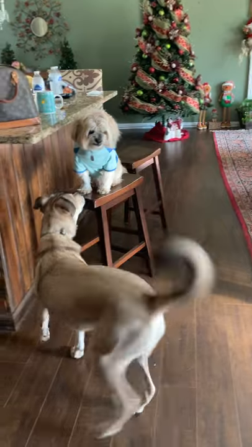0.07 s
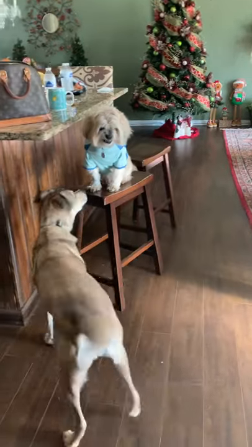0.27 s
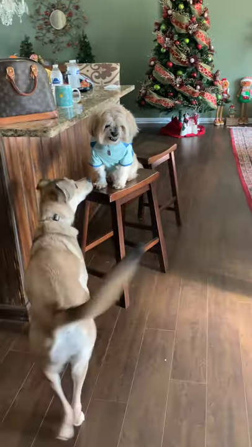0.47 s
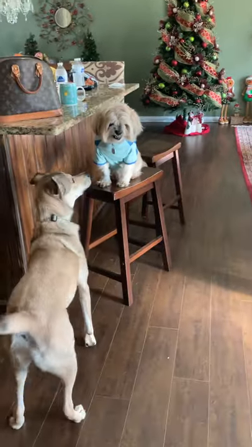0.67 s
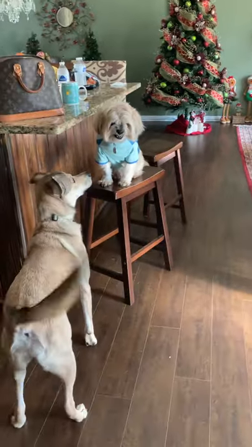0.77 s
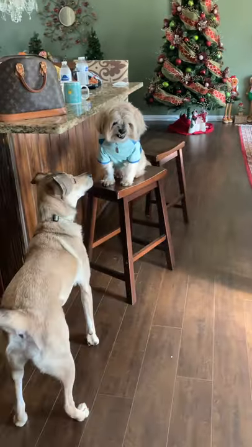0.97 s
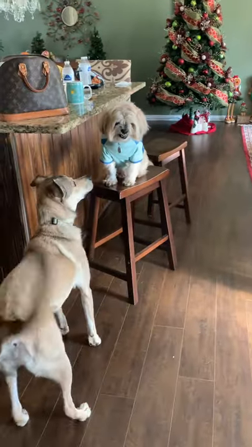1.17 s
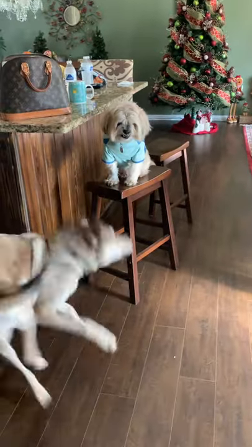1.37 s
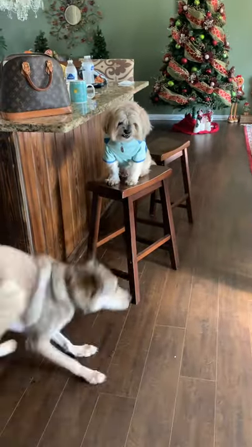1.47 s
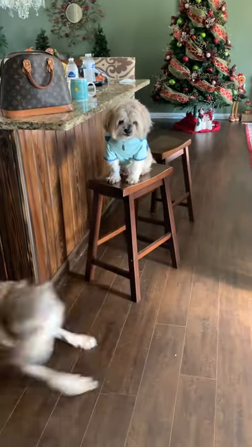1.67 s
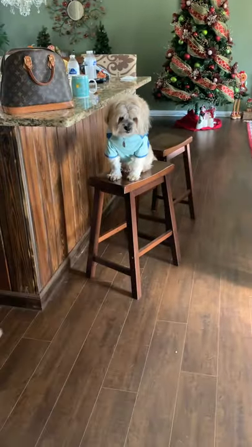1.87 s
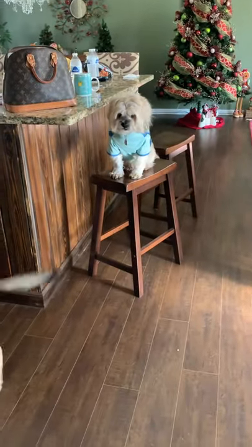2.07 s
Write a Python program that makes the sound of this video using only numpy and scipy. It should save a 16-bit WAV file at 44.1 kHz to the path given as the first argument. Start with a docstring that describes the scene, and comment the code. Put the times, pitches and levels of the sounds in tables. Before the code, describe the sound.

A large dog's paws shuffle on a hardwood floor, with a few soft lip smacks. After a lull it springs away, claws clicking and skidding, its weight thumping the boards in an echoing room with a faint hum.

```python
"""A large dog shuffles on a hardwood floor in a live room, over a low mains hum.
From 0.3 to 0.6 s it smacks its lips four times: wet ticks and popping mouth resonances.
After a lull it springs away at 1.1 s: claws tick and skid on the finish, pads knock the boards.
From 1.4 s on, its weight lands hard and makes the floor boom."""
import sys
import numpy as np
from scipy import signal
from scipy.fft import rfft, irfft
from scipy.io import wavfile
from scipy.ndimage import uniform_filter1d

SR = 44100
rng = np.random.default_rng(int(sys.argv[2]) if len(sys.argv) > 2 else 0)


def dump(signal):
    """Clip the signal to [-1, 1] and save it as 16-bit WAV at the path in sys.argv[1]."""
    limited = np.clip(np.atleast_2d(signal).T, -1, 1)
    pcm = np.round(limited * 32767).astype(np.int16)
    wavfile.write(sys.argv[1], SR, pcm)


N = 93977

# room air spectrum: freq_hz, gain_db
AIR_SPECTRUM = [(20, -14), (60, 2), (120, -2), (250, -2), (450, -17), (800, -15), (1300, -27), (3000, -44),
                (8000, -35), (16000, -35)]
# reverb decay: freq_hz, t60_s
REVERB_T60 = [(60, 0.04), (250, 0.78), (800, 0.84), (2500, 0.7045), (4500, 0.56), (8000, 0.44), (16000, 1)]
# reverb spectrum: freq_hz, gain_db
REVERB_SPECTRUM = [(60, -4.5), (150, 4), (400, 4.5), (1000, 1.5), (3500, 1), (8000, -0.5), (13800, -8),
                   (15700, -3), (16300, -32)]
# left-right likeness: freq_hz, coherence
STEREO_COHERENCE = [(50, 1), (200, 0.91), (500, 0.2), (1500, 0.12), (4100, 0.1), (5000, .95), (6200, 0.45),
                    (7200, 1), (8300, 0.55), (9500, 1), (10200, 1), (11100, .6), (11900, 1), (13000, 1),
                    (13600, .6), (14400, 1)]
# phase of left ahead of right: freq_hz, lead_rad
STEREO_LEAD = [(0, 0), (300, -.1), (1200, -.8), (1800, .2), (2600, 2.4), (3700, 4.3), (4500, 3.2),
               (5500, 3.3), (6700, 6.1), (7600, 6.4), (8500, 7.8), (9200, 9.4), (10200, 9.4), (11800, 12.5),
               (13200, 12.6), (14400, 15.7)]

# lip smacks: start_s, level_db, pitch_hz, tick_db, low_mode_weight_db
LIP_SMACKS = [(0.311, -29.5, 2097, -43, -1), (0.3572, -31.5, 2065, -35.5, -1),
              (0.4165, -32.5, 1980, -35, -5), (0.5707, -35.5, 2204, -28.5, -11)]
# mouth resonances: pitch_ratio, level_db, delay_s, decay_s
MOUTH_MODES = [(0.83, 3, 0, 0.0037), (.66, -5.5, .005, 0.013), (.3, -3, .005, 0.011)]
# smack noise spectrum: freq_hz, gain_db
SMACK_SPECTRUM = [(100, -10.5), (400, -9.5), (700, -3.5), (1400, -5), (2100, -12.5), (3000, -7.5),
                  (4200, -10), (6000, -18), (16000, -53)]
# wet tick spectrum: freq_hz, gain_db
WET_TICK_SPECTRUM = [(100, -7), (900, -15.5), (2000, -0.5), (2700, -4.5), (3600, 0.5), (4400, -0.5),
                     (5500, -15.5), (9000, -19), (13500, -24.5), (15700, -18), (16300, -43)]

# claws skidding on the finish: start_s, rise_s, decay_s, level_db, tilt_db_per_octave
CLAW_SKIDS = [(.04, 0.061, 0.021, -47.5, -0.5), (0.39, 0.033, 0.074, -52.5, -2.5),
              (0.491, 0.06, 0.038, -48.5, -1.5), (1.12, 0.034, 0.01, -47, -1),
              (1.146, 0.025, 0.027, -26.5, -1), (1.2, 0.027, 0.025, -26.5, -1),
              (1.47, 0.038, 0.054, -30.5, -1), (1.579, 0.029, 0.074, -34.5, 0),
              (1.68, 0.013, 0.012, -36.5, 0.5), (1.741, 0.011, .012, -39, -2),
              (1.834, 0.014, 0.023, -42.5, -2), (1.92, 0.098, 0.076, -41, -2)]
# skid spectrum: freq_hz, gain_db
SKID_SPECTRUM = [(100, -17.5), (600, -7), (1500, -5.5), (2400, -2), (3700, -1.5), (4700, -0.5), (6000, -3),
                 (7800, -3.5), (10000, 2.5), (13600, -8.5), (15700, -9), (16200, -61)]
# single claws dragging: start_s, length_s, level_db, from_hz, to_hz
CLAW_RASPS = [(1.172, 0.072, -33.5, 3512, 3600), (1.221, 0.025, -33, 7300, 7930),
              (1.528, .07, -39.5, 4316, 3427), (1.615, 0.042, -40, 8000, 7290)]
# claw strikes: start_s, level_db, decay_s, tilt_db_per_octave
CLAW_STRIKES = [(0.036, -53.5, 0.0099, 2), (0.055, -40.5, 0.0089, -8.5), (.104, -44, 0.0068, -8.5),
                (0.203, -54, 0.0091, 6.5), (1.005, -63, 0.0033, 0), (1.171, -8, 0.00051, 1),
                (1.1916, -15, 0.0011, -3.5), (1.205, -26, 0.00077, -15), (1.3683, -17, 0.0011, 9),
                (1.5117, -17, 0.0017, 8.5), (1.5156, -12, 0.0015, 7.5), (1.694, -34, 0.0097, 6.5)]
# claw strike spectrum: freq_hz, gain_db
CLAW_SPECTRUM = [(100, -14.5), (600, -18), (1500, -19), (2500, 1.5), (3800, 11), (5500, 4.5), (7500, 3.5),
                 (11000, -4.5), (13500, -0.5), (14600, -8), (16500, -54)]
# claw resonances: freq_hz, level_db, t60_s
CLAW_MODES = [(3470, -19.5, 0.0065), (6730, -6, 0.0054), (8100, -10.5, 0.01), (7860, -19, 0.0067)]

# hollow knocks of single boards: start_s, level_db, pitch_hz, decay_s
BOARD_KNOCKS = [(0.0355, -42.5, 1548, 0.0072), (0.0566, -32, 443, 0.0047), (0.0567, -34.5, 603, 0.0055),
                (0.171, -35.5, 214, 0.011), (0.229, -49, 208, 0.016), (.293, -48, 737, 0.013),
                (0.415, -31.5, 157, 0.0049), (0.732, -49.5, 762, 0.017), (1.069, -43, 756, 0.0096),
                (1.0685, -50, 363, 0.0062), (1.0674, -60, 1276, 0.0066), (1.1445, -37.5, 803, 0.0052),
                (1.3671, -20, 1265, 0.0026), (1.368, -24.5, 550, 0.0033), (1.476, -30.5, 815, 0.0089),
                (1.5148, -15.5, 1565, 0.0026), (1.514, -19.5, 792, 0.0073), (1.514, -22.5, 967, 0.0074),
                (1.514, -20, 359.7, 0.0094), (1.593, -29, 393, 0.0056), (1.594, -31, 821, 0.012),
                (1.655, -40, 768, 0.011), (1.708, -35, 738, 0.0061), (1.753, -34.5, 762, 0.0085),
                (1.756, -37, 417.7, 0.0096), (1.796, -35, 415, 0.011), (1.8, -46, 717, 0.0064),
                (1.85, -27.5, 348, 0.0088), (1.8495, -31, 718, 0.003)]
# pads slapping the boards: start_s, level_db, decay_s, tilt_db_per_octave
PAD_SLAPS = [(.058, -36.5, 0.0052, 1.5), (0.111, -40, 0.027, -2.5), (0.534, -43.5, 0.016, -3.5),
             (1.172, -39.5, 0.075, 4.5), (1.367, -24, 0.0075, 2), (1.388, -31.5, 0.045, -3.5),
             (1.44, -28, 0.0061, 1), (1.514, -17.5, 0.0052, 4.5), (1.545, -28, 0.027, -1.5),
             (1.717, -35, 0.0065, -4), (1.851, -29.5, 0.0093, -3.5), (1.894, -45, 0.045, 3),
             (2.02, -39.5, 0.053, 2)]
# pad slap spectrum: freq_hz, gain_db
PAD_SPECTRUM = [(30, -23.5), (90, 7.5), (170, 10), (400, 2), (600, -9.5), (850, -3), (1200, -16),
                (1700, -9.5), (2600, -21.5), (5000, -22.5), (16000, -39)]
# board resonances: freq_hz, level_db, t60_s
BOARD_MODES = [(344, -26, 0.22), (431, -15.5, 0.18), (706, -8, 0.087), (773, -52, 0.14), (1020, -13, 0.046)]
# weight landing on the floor: deepest_flex_s, level_db, pitch_hz, half_width_s
LANDINGS = [(0.08, -32.5, 92.8, 0.018), (0.141, -37, 91, 0.026), (0.186, -36, 108, 0.008),
            (.425, -58, 157, 0.0028), (0.57, -44, 107, 0.013), (1.216, -41, 89.5, 0.013),
            (1.248, -48, 81, 0.0077), (1.293, -42, 104, 0.0092), (1.3934, -14.5, 105.8, 0.0071),
            (1.425, -27.5, 70, 0.012), (1.5386, -9, 79.8, 0.0098), (1.601, -31, 62.5, 0.022),
            (1.727, -32.5, 85, 0.015), (1.876, -14.5, 71, 0.015), (2.058, -24, 72, 0.0091)]
# floor resonances: freq_hz, level_db, t60_s
FLOOR_MODES = [(66, -9.5, 0.25), (105.4, -15, 0.42), (167.5, -26, 0.46), (239.7, -26, 0.57),
               (363.4, -43.5, 1)]

EVENT_TIME_S = np.arange(SR // 2) / SR


def amp(db):
    """Decibels to gain."""
    return 10 ** (np.asarray(db) / 20)


def unit_rms(x):
    """Scale to rms 1."""
    return x / np.sqrt(np.mean(x ** 2) + 1e-20)


def lookup(points, hz):
    """Interpolate a table over log frequency."""
    table_hz, value = np.transpose(points)
    return np.interp(np.log(hz + 1), np.log(table_hz + 1), value)


def add(mix, start_s, sound):
    """Mix a sound in at start_s."""
    part = mix[max(round(start_s * SR), 0):][:len(sound)]
    part += sound[:len(part)]


def butter(order, cutoff_hz, kind="low"):
    """Butterworth filter sections."""
    return signal.butter(order, cutoff_hz, kind, fs=SR, output="sos")


def colour(x, spectrum, tilt_db_per_octave=0, size=2048):
    """Minimum-phase filter of unit energy."""
    hz = abs(np.fft.fftfreq(size, 1 / SR))
    gain_db = lookup(spectrum, hz) + tilt_db_per_octave * np.log2(np.maximum(hz, 100))
    log_response = np.conj(signal.hilbert(np.log(amp(gain_db))))
    taps = np.fft.ifft(np.exp(log_response)).real
    return signal.fftconvolve(x, taps / np.linalg.norm(taps))[:len(x)]


def wobble(rate_hz):
    """Random wavering up to rate_hz, rms 1."""
    return unit_rms(signal.sosfilt(butter(2, rate_hz), rng.standard_normal(len(EVENT_TIME_S))))


def burst(decay_s):
    """Decaying contact noise, whitened; energy set by decay_s."""
    fade = np.exp(-EVENT_TIME_S / decay_s)
    noise = rng.standard_normal(len(fade))
    for _ in range(3):
        spectrum = rfft(noise * fade)
        white = irfft(spectrum / (abs(spectrum) + 1e-12), len(fade))
        noise = white / np.sqrt(fade ** 2 + 0.01)
    return unit_rms(noise * fade) * np.sqrt(np.mean(fade ** 2))


def ring(modes, detune):
    """Decaying modes, tuned slightly differently at each spot struck."""
    out, t = 0, EVENT_TIME_S
    for hz, level_db, t60_s in modes:
        spot_hz = hz * (1 + detune * rng.standard_normal())
        out += amp(level_db - 60 * t / t60_s) * np.sin(2 * np.pi * spot_hz * t)
    return out


def stereo_pair(left, other):
    """Partly coherent left and right from two independent noises."""
    hz = np.fft.rfftfreq(len(left), 1 / SR)
    coherence = np.clip(lookup(STEREO_COHERENCE, hz), 0, 1)
    right = irfft(coherence * rfft(left) + np.sqrt(1 - coherence ** 2) * rfft(other), len(left))
    return np.array([left, right])


def phase_spread(x):
    """Phase difference between left and right."""
    size = 2 * N
    lead_rad = np.interp(np.fft.rfftfreq(size, 1 / SR), *np.transpose(STEREO_LEAD))
    rotation = np.exp(0.5j * np.array([lead_rad, -lead_rad]))
    return irfft(rfft(x, size) * rotation, size)[:, :N]


def air_and_hum(air_db=-61.5, hum_hz=60.1, hum_db=-50.5):
    """Still room air and an appliance's mains hum."""
    air = stereo_pair(*[colour(noise, AIR_SPECTRUM) for noise in rng.standard_normal((2, N))])
    hum = unit_rms(np.sin(2 * np.pi * hum_hz * np.arange(N) / SR))
    return amp(air_db) * air + amp(hum_db) * hum


def reverb(x, early_db=7.5, early_s=0.0076, rise_s=0.006):
    """Dense room reflections, strongest early, each band decaying at its own rate."""
    hz, t, bands = signal.stft(stereo_pair(*rng.standard_normal((2, SR))), SR, nperseg=256)
    t60_s = lookup(REVERB_T60, hz)[:, None]
    fade = amp(-60 * t / t60_s + early_db * np.exp(-t / early_s))
    fade /= np.sqrt(SR * np.mean(fade ** 2, axis=1, keepdims=True))
    gain = amp(lookup(REVERB_SPECTRUM, hz))[:, None]
    tail = signal.istft(bands * fade * gain, SR, nperseg=256)[1]
    tail *= np.minimum(np.arange(tail.shape[1]) / SR / rise_s, 1)
    return signal.fftconvolve(x[None], tail, axes=1)[:, :N]


def furniture_echoes(x, per_side=6, max_db=-15, min_delay_s=0.0015, span_s=0.0083):
    """Single reflections off the nearby cabinet and stools."""
    out = np.zeros((2, N))
    x = signal.sosfilt(butter(2, 473, "high"), x)
    x = signal.sosfilt(butter(10, 13500), x)
    for side in out:
        for distance, strength in rng.random((per_side, 2)):
            add(side, min_delay_s + span_s * distance, amp(max_db) * (2 * strength - 1) * x)
    return out


def lip_smacks(sag=0.23, glide_s=0.0043, rough_rad=0.96, rise_s=0.00055, noise_gain=0.61):
    """A wet tick and a noise burst; mouth resonances pop, sagging in pitch as the lips part."""
    out, t = np.zeros(N), EVENT_TIME_S
    for start_s, level_db, pitch_hz, tick_db, low_weight_db in LIP_SMACKS:
        for ratio, mode_db, delay_s, decay_s in MOUTH_MODES:
            hz = pitch_hz * ratio * (1 + sag * np.exp(-t / glide_s))
            pop = np.sin(2 * np.pi * np.cumsum(hz) / SR + rough_rad * wobble(pitch_hz * ratio / 5))
            envelope = np.exp(-t / decay_s) * (1 - np.exp(-t / rise_s))
            gain = amp(level_db + mode_db + low_weight_db * (2 - ratio))
            add(out, start_s + delay_s, gain * pop * envelope)
        add(out, start_s, amp(level_db) * noise_gain * colour(burst(decay_s=0.014), SMACK_SPECTRUM))
        add(out, start_s, amp(tick_db) * colour(burst(decay_s=0.0025), WET_TICK_SPECTRUM))
    return out


def claw_skids(grain_db=3, chatter_db=3.5):
    """Dense tiny slips that swell and fade with paw pressure."""
    out, t = np.zeros(N), EVENT_TIME_S
    for start_s, rise_s, decay_s, level_db, tilt in CLAW_SKIDS:
        grain = unit_rms(uniform_filter1d(rng.standard_normal(len(t)), size=90))
        grainy_noise = rng.standard_normal(len(t)) * amp(grain_db * grain)
        bands = signal.stft(grainy_noise, nperseg=512)[2]
        # random level patches over frequency and time
        chatter = uniform_filter1d(rng.standard_normal(bands.shape), size=4, axis=0)
        chatter = unit_rms(uniform_filter1d(chatter, size=3, axis=1))
        slips = unit_rms(signal.istft(bands * amp(chatter_db * chatter), nperseg=512)[1][:len(t)])
        pressure = np.minimum(t / rise_s, 1) ** 2 * np.exp(-np.maximum(t - rise_s, 0) / decay_s)
        add(out, start_s, amp(level_db) * colour(slips * pressure, SKID_SPECTRUM, tilt))
    return out


def claw_rasps(half_band_hz=780, grain_db=1.5, slip_rate_hz=250):
    """A dragged claw sticks and slips: a rough, gliding whistle."""
    out = np.zeros(N)
    for start_s, length_s, level_db, from_hz, to_hz in CLAW_RASPS:
        progress = np.minimum(EVENT_TIME_S / length_s, 1)
        hz = from_hz + (to_hz - from_hz) * progress
        carrier = np.exp(2j * np.pi * np.cumsum(hz) / SR)
        rasp = (carrier * (wobble(half_band_hz) + 1j * wobble(half_band_hz))).real
        swell = np.sqrt(4 * progress * (1 - progress))
        add(out, start_s, amp(level_db + grain_db * wobble(slip_rate_hz)) * rasp * swell)
    return out


def claw_ticks():
    """Claws strike the finish and ring briefly."""
    out = np.zeros(N)
    for start_s, level_db, decay_s, tilt in CLAW_STRIKES:
        tick = colour(burst(decay_s), CLAW_SPECTRUM, tilt)
        add(out, start_s, amp(level_db) * (tick + ring(CLAW_MODES, detune=0.013)))
    return out


def board_knocks(rattle_rad=0.57, rise_s=0.0007):
    """One damped, slightly rattling board resonance per knock."""
    out, t = np.zeros(N), EVENT_TIME_S
    for start_s, level_db, pitch_hz, decay_s in BOARD_KNOCKS:
        tone = np.sin(2 * np.pi * pitch_hz * t + rattle_rad * wobble(pitch_hz / 4))
        envelope = np.exp(-t / decay_s) * (1 - np.exp(-t / rise_s))
        add(out, start_s, amp(level_db) * tone * envelope)
    return out


def pad_slaps():
    """Soft pads slap the boards and set them ringing."""
    out = np.zeros(N)
    for start_s, level_db, decay_s, tilt in PAD_SLAPS:
        slap = colour(burst(decay_s), PAD_SPECTRUM, tilt)
        add(out, start_s, amp(level_db) * (slap + ring(BOARD_MODES, detune=0.09)))
    return out


def floor_boom():
    """The floor flexes under the dog's weight, then rings from a quarter cycle past the deepest flex."""
    out = np.zeros(N)
    for deepest_s, level_db, pitch_hz, half_width_s in LANDINGS:
        offset_s = EVENT_TIME_S - 3 * half_width_s
        flex = -np.cos(2 * np.pi * pitch_hz * offset_s) * np.exp(-(offset_s / half_width_s) ** 2)
        add(out, deepest_s + offset_s[0], amp(level_db) * flex)
        add(out, deepest_s + 1 / pitch_hz / 4, amp(level_db) * ring(FLOOR_MODES, detune=0.0044))
    return out


def scene(boom_pan_db=1.8, boom_send_db=-8, direct_tick_db=-3.5):
    """The dog in the room: ticks from straight ahead, boom mostly through the floor."""
    ticks = claw_ticks()
    taps = pad_slaps() + board_knocks() + lip_smacks()
    scrapes = claw_skids() + claw_rasps()
    boom = floor_boom()
    boom_pan = amp(boom_pan_db * np.array([[-0.5], [0.5]]))
    near = taps + scrapes + boom * boom_pan + furniture_echoes(taps + ticks)
    far = reverb(taps + scrapes + ticks + amp(boom_send_db) * boom)
    return amp(direct_tick_db) * ticks + phase_spread(near + far + air_and_hum())


def record(dry, bass_cut_hz=28, silent_s=0.035, fade_in_s=0.00056, band_limit_hz=17000):
    """Bass cut, fast fade-in after a short silence, band limit."""
    dry = signal.sosfiltfilt(butter(2, bass_cut_hz, "high"), dry)
    fade_in = np.clip((np.arange(N) / SR - silent_s) / fade_in_s, 0, 1)
    lowpass = signal.firwin(255, band_limit_hz, window=("kaiser", 9), fs=SR)
    return signal.oaconvolve(dry * fade_in, lowpass[None], "same")


dry = scene()
out = record(dry)
dump(out)
```